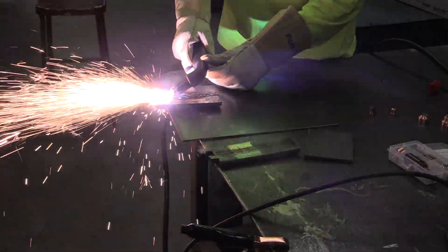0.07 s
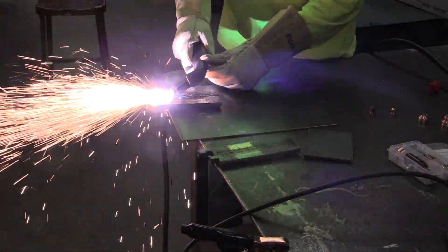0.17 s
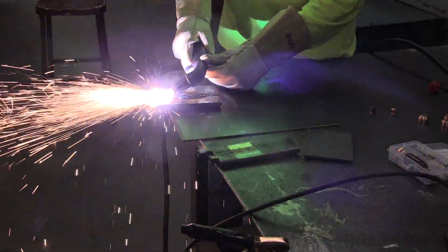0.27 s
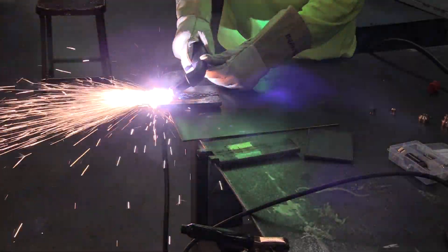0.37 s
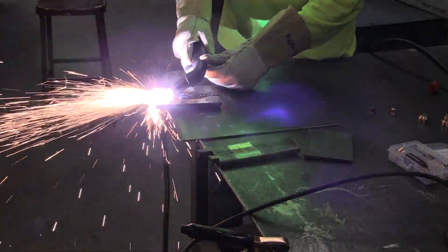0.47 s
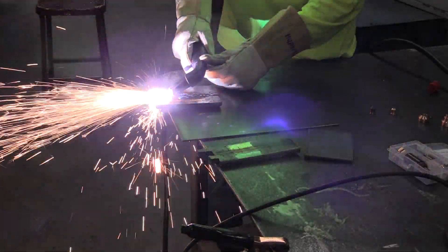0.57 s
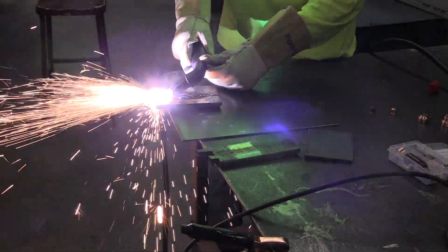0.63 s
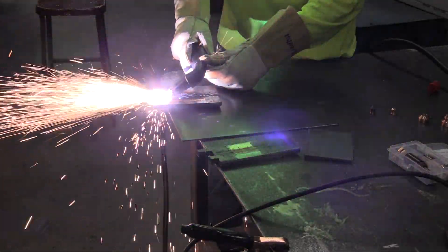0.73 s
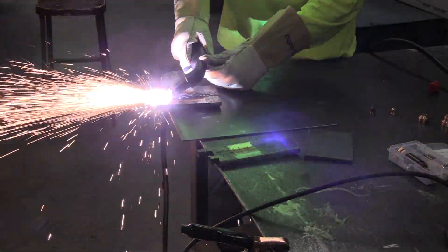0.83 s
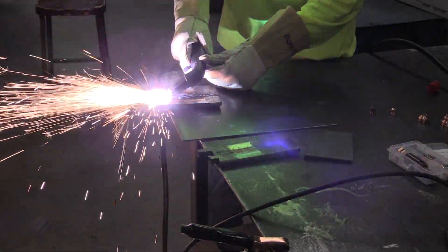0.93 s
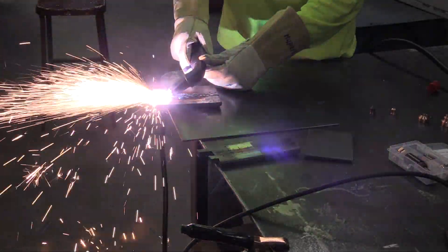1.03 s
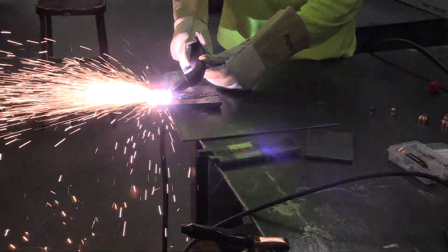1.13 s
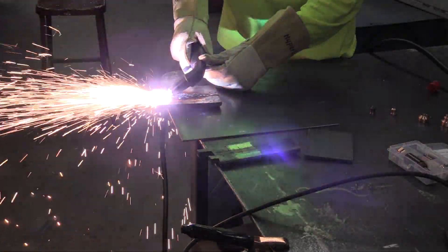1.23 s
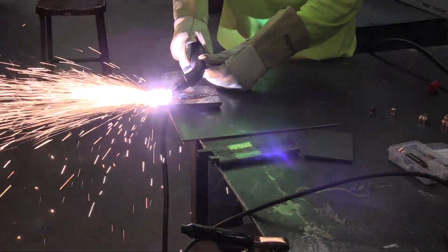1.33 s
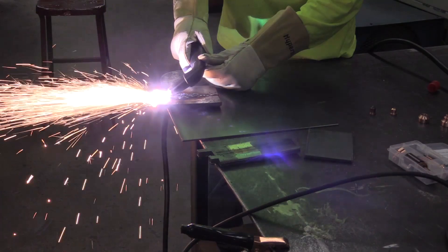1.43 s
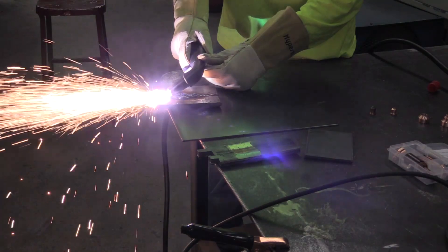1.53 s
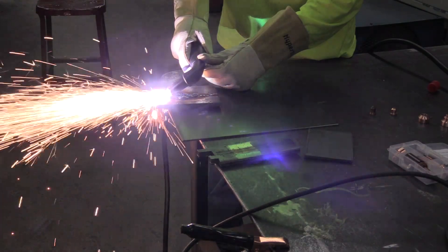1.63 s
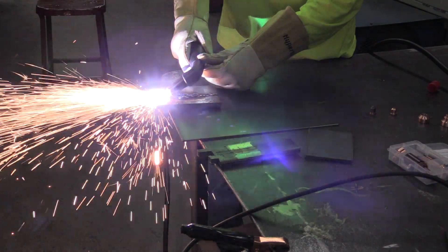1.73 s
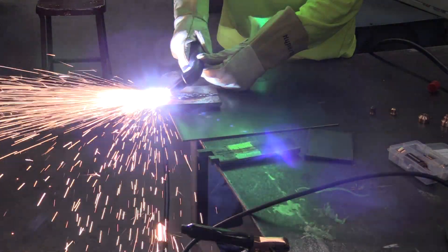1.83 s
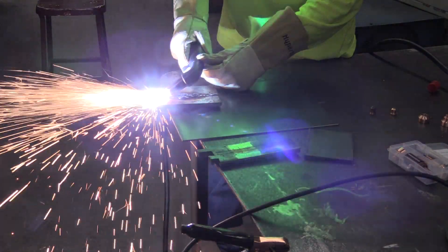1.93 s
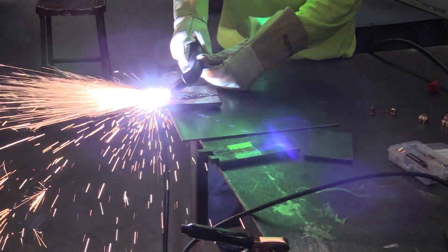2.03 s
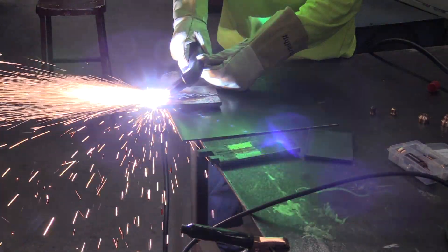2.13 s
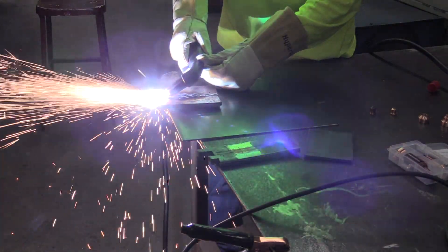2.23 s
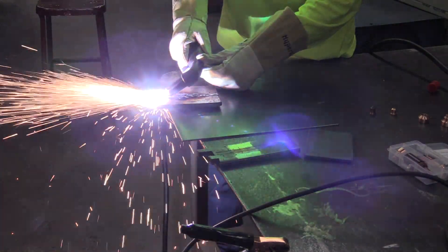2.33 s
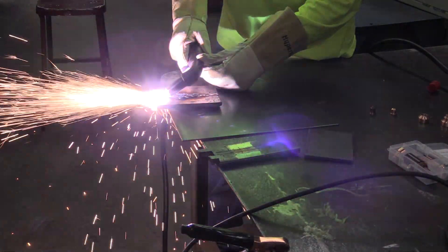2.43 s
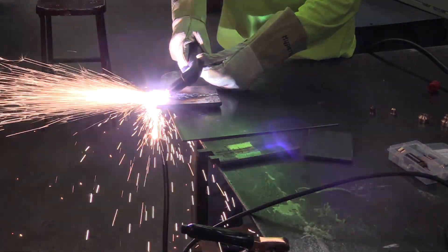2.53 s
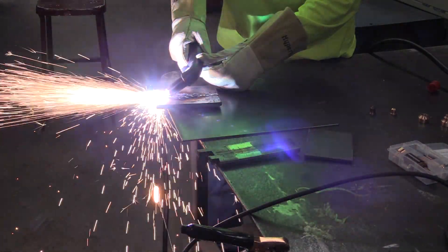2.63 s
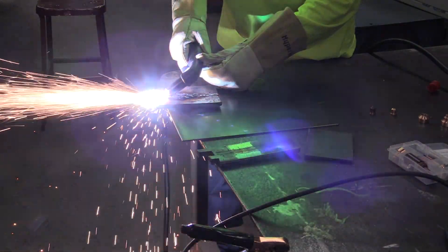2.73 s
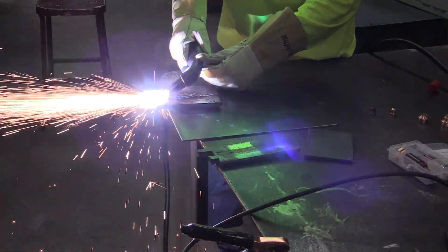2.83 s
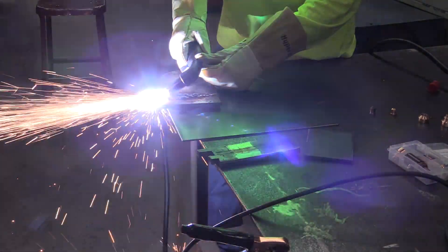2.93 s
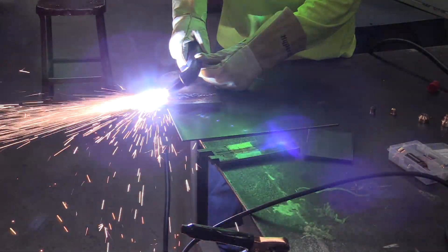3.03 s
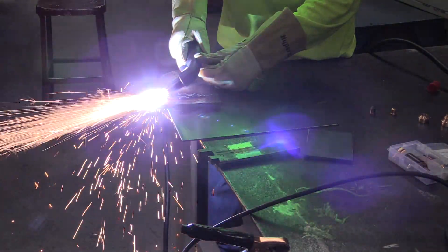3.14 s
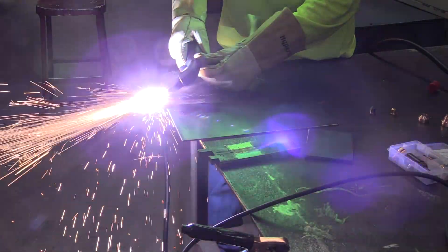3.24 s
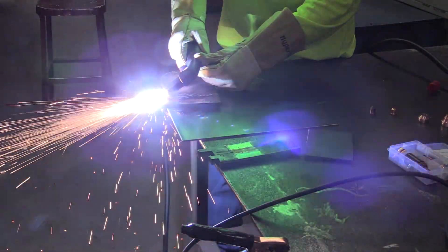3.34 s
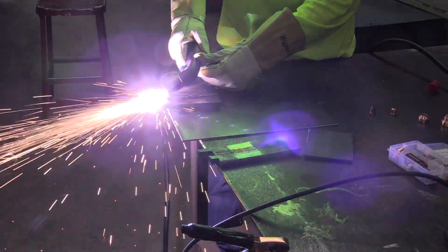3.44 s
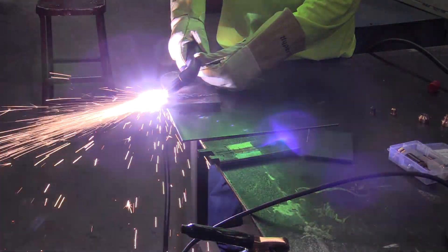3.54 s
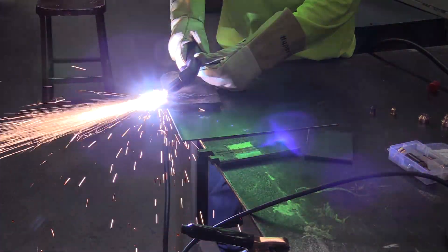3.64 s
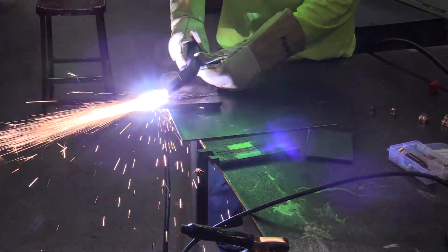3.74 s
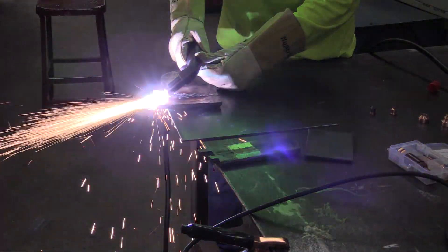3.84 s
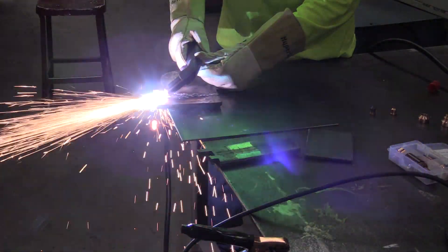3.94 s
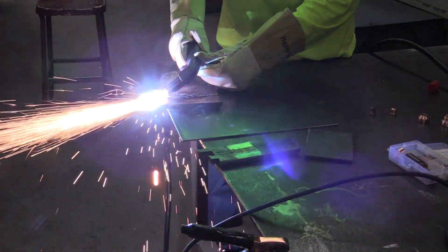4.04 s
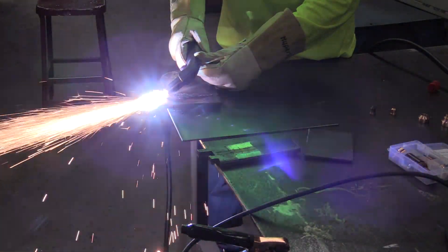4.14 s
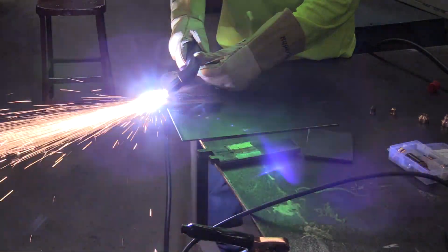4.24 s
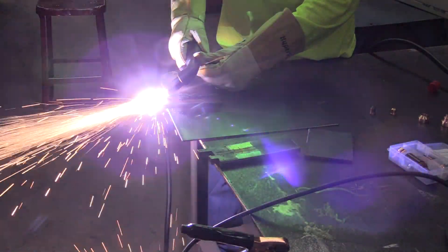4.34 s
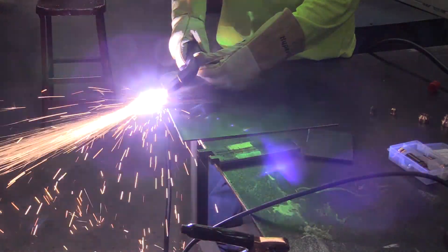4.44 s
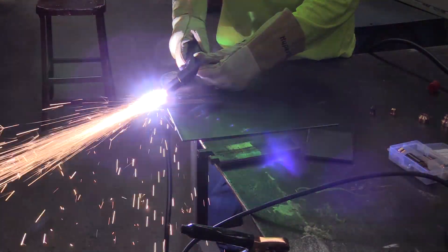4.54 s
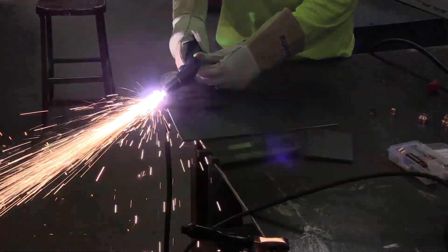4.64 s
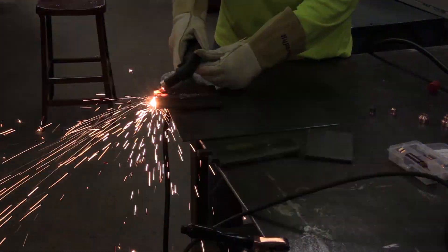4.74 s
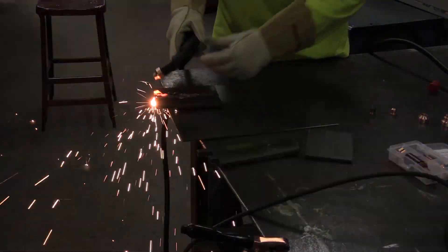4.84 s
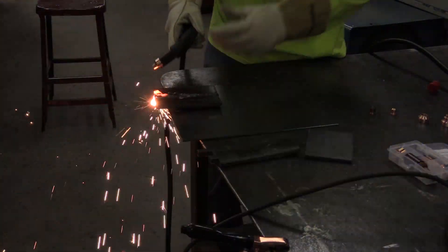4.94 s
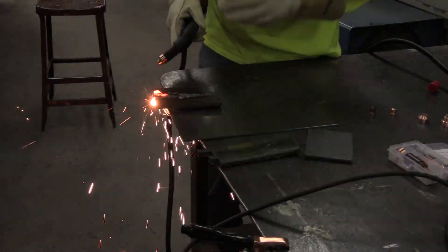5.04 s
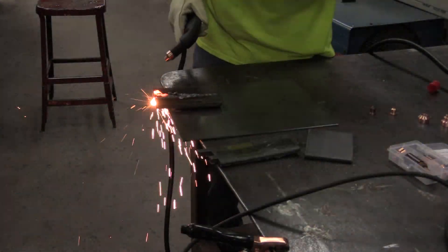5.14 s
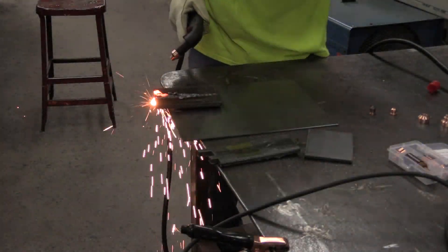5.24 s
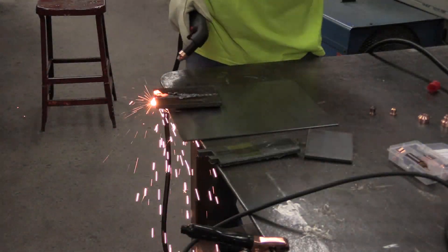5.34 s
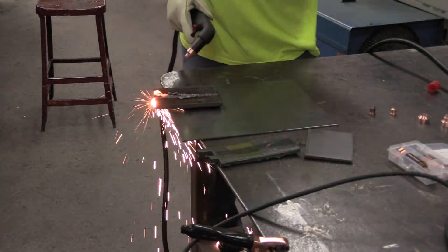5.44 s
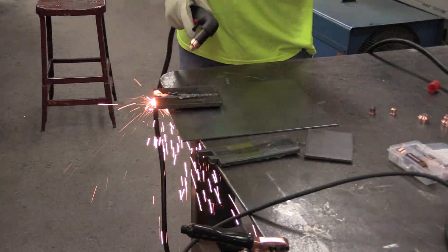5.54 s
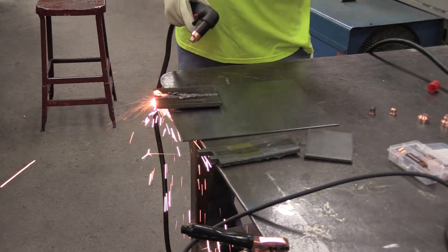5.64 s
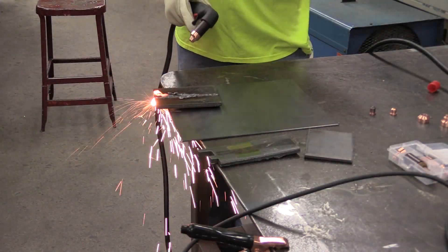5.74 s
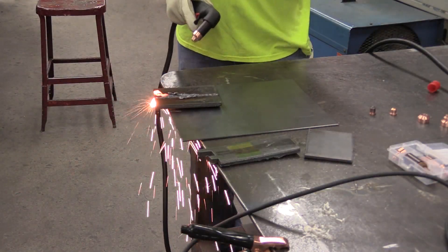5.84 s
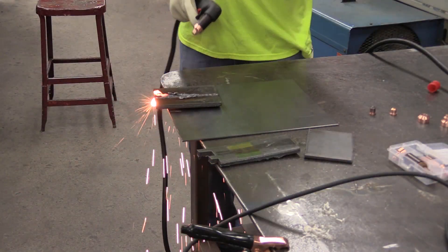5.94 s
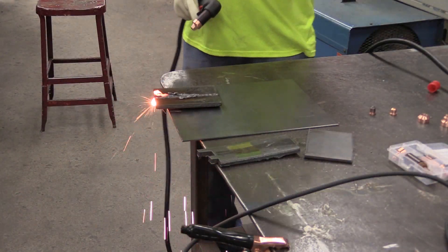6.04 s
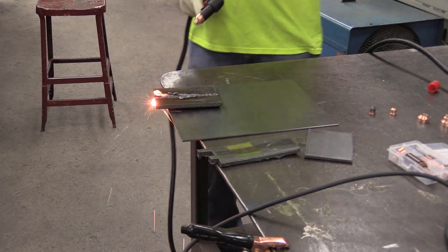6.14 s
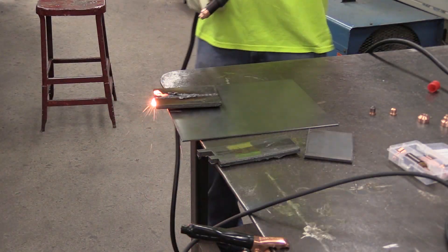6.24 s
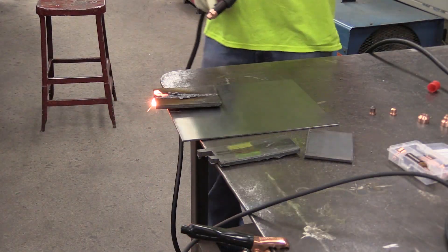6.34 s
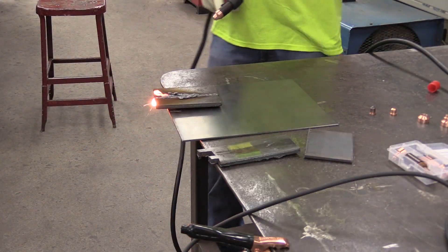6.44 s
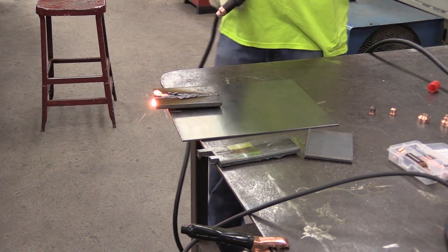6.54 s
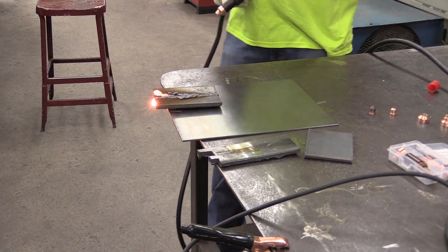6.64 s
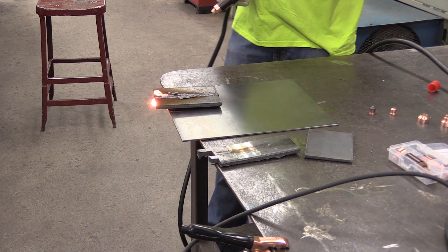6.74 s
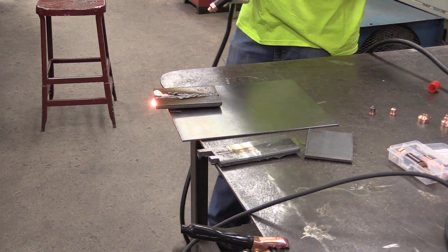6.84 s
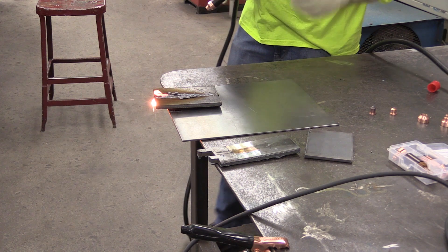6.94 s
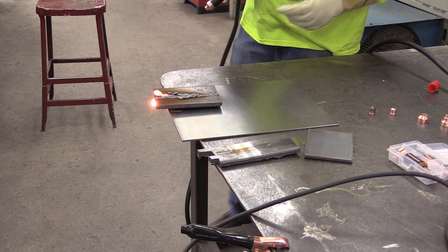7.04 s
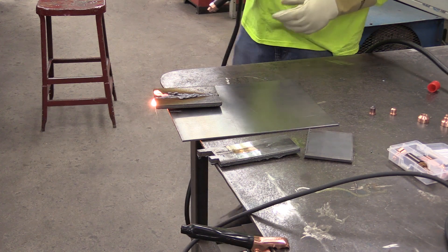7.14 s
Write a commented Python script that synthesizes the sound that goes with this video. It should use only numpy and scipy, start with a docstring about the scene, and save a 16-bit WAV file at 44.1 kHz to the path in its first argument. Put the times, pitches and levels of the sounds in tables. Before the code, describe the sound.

A plasma torch gouges steel with a loud hissing roar, then cuts off, leaving a quieter air hiss and one light knock.

```python
"""A plasma torch gouges steel on a metal workbench: its turbulent arc jet roars and spits melt,
comb-filtered by echoes off bench and floor, until it snaps off and only the cooling air hisses on.
Over the workshop's rumble the power unit's fan gathers speed, and the worker steps back with a scuff
and a knock. A microphone's automatic gain, held down by the roar, creeps back up once the arc is out."""
import sys
import numpy as np
from scipy import signal
from scipy.fft import rfft, irfft
from scipy.io import wavfile
from scipy.ndimage import uniform_filter1d, minimum_filter1d, map_coordinates

SR = 44100
rng = np.random.default_rng(int(sys.argv[2]) if len(sys.argv) > 2 else 0)


def wav_out(sig):
    """Save sig, one row per channel (or a flat mono array), as 16-bit PCM at SR to the path in sys.argv[1]."""
    wavfile.write(sys.argv[1], SR, np.round(np.clip(np.atleast_2d(sig).T, -1, 1) * 32767).astype(np.int16))


N = 317079
T = np.arange(N) / SR
F = np.maximum(np.arange(N // 2 + 1) * SR / N, 1)

ARC_OFF_S = 4.7494
# the nozzle is lifted off the steel, then turned outwards
LIFT_S, LIFT_LENGTH_S, TURN_S, TURN_LENGTH_S = 4.955, 0.32, 5.42, 1.4
FAN_HZ, FAN_TOP_HZ, SPIN_UP_S, SPIN_UP_HZ_PER_S = 72.6, 78.7, 5.87, 5.5

# echoes off bench, floor and worker, one list each: delay/s; gain; treble limit/Hz
ECHO_DELAYS = [.000995, .001727, .001856, .004007, .004487, .006905, .007212, .007396, .008141]
ECHO_GAINS = [0.043, 0.02, 0.046, 0.24, -0.12, 0.2, 0.15, -0.21, 0.11]
ECHO_CUTOFFS = [15000, 15000, 14000, 9600, 1400, 3800, 2300, 1000, 3200]
# workshop rumble: f/Hz, relative spectral level/dB
SHOP_SPECTRUM = [(25, -28), (50, -17), (75, -8), (110, -9), (165, -6), (196, 1), (228, -2), (400, -9),
                 (800, -12.5), (1600, -15.5), (4000, -42)]
# fan harmonics and housing resonances: order, f/Hz, width/Hz, level off resonance/dB, boost/dB
FAN_ORDERS = [(7, 508, 49, -63, 12), (12, 892, 28, -64, 11.5), (16, 1226, 32, -56, 6)]
# shoe and clothing rubs: t/s, Gaussian width/s, centre f/Hz, level/dB
RUBS = [(5.558, 0.088, 270, -42), (5.874, 0.057, 105, -50)]
# a sharp contact, then a duller seating: t/s, level/dB, treble limit/Hz
CONTACTS = [(5.954, -20, 3000), (5.9562, -16, 645)]
# modes of the bumped object: f/Hz, relative level/dB, T60/s
BODY_MODES = [(450, -24, 0.031), (576, -16, 0.062), (658, 0.5, 0.083), (1153, -6.5, 0.066),
              (1650, -3.5, 0.044), (1780, -5.5, 0.046), (2070, -4, .045), (2360, -11, .025)]
# cooling air: f/Hz, relative spectral level/dB
AIR_SPECTRUM = [(300, -20.5), (1000, -12.5), (1500, -9.5), (2300, -3.5), (2800, -1), (3300, -8),
                (3700, 0.5), (4200, -1.5), (5300, -3), (7000, -7), (8400, -4.5), (10800, -11.5),
                (14000, -9), (15700, -10.5)]
# breathy edge tone of the turning nozzle: t/s, f/Hz
EDGE_TONE = [(6.1, 14250), (6.35, 14400), (6.55, 15500), (6.7, 14100), (7.19, 13900)]
# hand strokes along the groove: start t/s, relative level/dB, sizzle/dB, body/dB
HAND_STROKES = [(0.0, -20, 1, -1), (0.59, -20, 0.2, -1.3), (1.2, -20.1, 1, -1), (1.66, -20.5, 1, 1.8),
                (2.07, -20.5, 1.3, 1.5), (2.49, -19.5, 0.2, -0.1), (3.03, -20.5, 0, .7),
                (3.36, -19.0, -1.5, -0.3), (3.96, -20, 0.4, .5), (4.29, -20, -.3, 0)]
# gobs of melt blown out: t/s, added sizzle/dB
MELT_FLARES = [(.19, 1.3), (1.0, 2), (1.86, 1), (3.25, 1.8), (4.7, 3.5)]
# resonances and notches of the gap between nozzle and groove: f/Hz, width/Hz, nominal gain/dB
GAP_RESONANCES = [(1235, 130, 3), (2290, 70, 2.5), (3220, 18, 2.5), (4350, 110, -4), (6560, 140, 3),
                  (6670, 160, -2.5), (7070, 150, 1.5), (7800, 320, 2), (9260, 130, 1.5), (9560, 150, 3.5),
                  (10500, 300, -1), (11400, 220, 4), (12400, 370, 2), (12700, 280, 6.5), (14000, 180, -2.5),
                  (14310, 280, 8), (14760, 200, -2.5), (15050, 280, 8)]
# arc jet: f/Hz, relative spectral level/dB
JET_SPECTRUM = [(30, -59), (95, -38), (160, -20.5), (330, -18), (480, -10.5), (900, -10), (1400, -8.5),
                (1750, -4), (2700, -2.5), (3200, 0), (4400, -5), (6300, -7.5), (11000, -16.5), (15500, -26)]


def undb(db):
    """Amplitude ratio of a level in decibels."""
    return 10 ** (np.asarray(db) / 20)


def unit(x):
    """Normalisation to rms 1."""
    return x / np.sqrt(np.mean(x ** 2))


def colour(points):
    """Gain spectrum interpolated over log frequency from points (f/Hz, level/dB)."""
    hz, db = np.transpose(points)
    return undb(np.interp(np.log(F), np.log(hz), db))


def shape(x, gain):
    """Linear filtering: multiplication of the spectrum by a gain."""
    return irfft(rfft(x) * gain, N)


def noise(gain):
    """Filtered Gaussian noise, rms 1."""
    return unit(shape(rng.standard_normal(N), gain))


def walk(rate_hz):
    """Slow random fluctuation: low-pass noise, rms 1."""
    return noise(1 / (1 + (F / rate_hz) ** 4))


def ramp(start_s, length_s):
    """Linear transition from 0 to 1."""
    return np.clip((T - start_s) / length_s, 0, 1)


def shelf(x, hz, db):
    """Shelving filter: a time-varying gain above hz."""
    return x + (undb(db) - 1) * shape(x, 1 / (1 + (hz / F) ** 4))


def resonance(hz, width_hz):
    """Narrow-band noise by quadrature modulation about a centre that may move, rms 1."""
    skirt = 1 / (1 + (2 * F / width_hz) ** 4)
    phase = 2 * np.pi * np.cumsum(hz * np.ones(N)) / SR
    return noise(skirt) * np.cos(phase) + noise(skirt) * np.sin(phase)


def delayed(x, delay_s):
    """Variable delay, whose rate of change shifts the pitch."""
    return map_coordinates(x, [(T - delay_s) * SR], mode="mirror")


def reverberation(x, wet_db, t60, damp_hz, first_s):
    """A diffuse field: dense reflections begin after first_s and decay exponentially."""
    decay = undb(-60 * np.minimum(T / t60, 4)) * (T > first_s)
    tail = noise(1 / (1 + (F / damp_hz) ** 2)) * decay
    tail = tail[:SR] / np.sqrt(np.mean(abs(rfft(tail)[F < 4000]) ** 2))
    return undb(wet_db) * signal.fftconvolve(x, tail)[:N]


def near_echoes(x):
    """Interference with echoes off nearby hard surfaces combs the spectrum."""
    echoes = sum(gain * np.exp(-2j * np.pi * F * delay) / (1 + (F / hz) ** 2)
                 for delay, gain, hz in zip(ECHO_DELAYS, ECHO_GAINS, ECHO_CUTOFFS))
    return shape(x, 1 + echoes)


def clutter(x):
    """Scattering: tools and offcuts on the bench return the short wavelengths."""
    scattered = reverberation(x, wet_db=-11, t60=.07, damp_hz=30000, first_s=.002)
    return shape(scattered, 1 / (1 + (3500 / F) ** 4))


def shop_rumble(level_db=-46.5, swell_db=1):
    """Ventilation and machines radiate broadband noise, strongest in the bass."""
    return noise(colour(SHOP_SPECTRUM)) * undb(level_db + swell_db * walk(15))


def drone(hz=196, width_hz=50, level_db=-57, rise_db=5):
    """Narrow-band noise, heard as a rough drone, grows as the fan gathers speed."""
    spin_up = ramp(SPIN_UP_S, (FAN_TOP_HZ - FAN_HZ) / SPIN_UP_HZ_PER_S)
    return resonance(hz, width_hz) * undb(level_db + rise_db * spin_up)


def fan(wobble=0.0013, flicker_db=2):
    """Forced resonance: with the load gone the fan speeds up, sweeping harmonics past housing modes."""
    shaft_hz = np.clip(FAN_HZ + SPIN_UP_HZ_PER_S * (T - SPIN_UP_S), FAN_HZ, FAN_TOP_HZ)
    angle = 2 * np.pi * np.cumsum(shaft_hz * (1 + wobble * walk(21))) / SR
    out = np.zeros(N)
    for order, hz, width_hz, db, boost_db in FAN_ORDERS:
        order = round(order)
        in_tune = 1 / (1 + (2 * (order * shaft_hz - hz) / width_hz) ** 2)
        level_db = db + boost_db * in_tune + flicker_db * walk(7.5)
        out += np.sqrt(2) * np.sin(order * angle) * undb(level_db)
    return out


def scuffs(rough_db=3):
    """Sliding friction of shoe and clothing gives short, dull, uneven bursts of noise."""
    out = np.zeros(N)
    for t, width_s, hz, db in RUBS:
        rub = noise(1 / (1 + (F / hz - hz / F) ** 2) ** 0.53)
        envelope = np.exp(-.5 * ((T - t) / width_s) ** 2)
        out += rub * envelope * undb(db + rough_db * walk(40))
    return out


def knock(low_cut_hz=370):
    """Impact excites the damped modes of a hard object; softer contact leaves out the high ones."""
    out = np.zeros(N)
    for t, db, soft_hz in CONTACTS:
        age = np.maximum(T - t, 0)
        for hz, mode_db, t60 in BODY_MODES:
            envelope = undb(db + mode_db - 60 * np.minimum(age / t60, 4))
            out += envelope * np.sin(2 * np.pi * hz * age) / (1 + (hz / soft_hz) ** 4)
    # a small body radiates little bass
    return signal.sosfilt(signal.butter(2, low_cut_hz, "high", fs=SR, output="sos"), out)


def bench_sweep(x, gain=0.095, near_s=0.000286, far_s=0.0009, sway_s=0.00003):
    """A moving comb filter: the path of the bench echo changes as the nozzle rises and sways."""
    rise = ramp(LIFT_S, LIFT_LENGTH_S + TURN_LENGTH_S)
    return x + gain * delayed(x, near_s + (far_s - near_s) * rise + sway_s * walk(1.5))


def cooling_air(free_db=-33, splash_db=5.5, shade_db=-8.5, facing_db=2, whistle_db=-12, flutter_db=0.8):
    """Turbulent air hisses and excites the nozzle; impinging on the steel, it is louder and duller."""
    lift, turn = ramp(LIFT_S, LIFT_LENGTH_S), ramp(TURN_S, TURN_LENGTH_S)
    level_db = free_db + splash_db * (1 - lift)
    treble_db = shade_db * (1 - ramp(LIFT_S, length_s=0.24)) + facing_db * turn
    hiss = bench_sweep(shelf(noise(colour(AIR_SPECTRUM)), 4400, treble_db))
    # the nozzle rings louder and lower as it comes free and turns
    nozzle_db = -8.5 + 4 * ramp(TURN_S, length_s=.3) + 2.5 * turn
    nozzle = resonance(hz=3330 - 230 * turn, width_hz=820) * undb(nozzle_db + 0.5 * walk(13))
    whistle_hz = np.interp(T, *np.transpose(EDGE_TONE))
    whistle = resonance(whistle_hz, width_hz=1000) * undb(whistle_db) * turn
    return (hiss + nozzle + whistle) * undb(level_db + flutter_db * walk(24))


def snap(gain_db=-0.5, width_s=0.00012, low_cut_hz=95):
    """The hot gas column collapses as the current stops, radiating one rarefaction pulse."""
    pulse = -undb(gain_db) * np.exp(-.5 * ((T - ARC_OFF_S) / width_s) ** 2)
    return shape(pulse, 1 / (1 + low_cut_hz / (1j * F)))


def spatter(rate_per_s=500, spread_db=1.5, level_db=-14, low_cut_hz=1500):
    """Shot noise: droplets of melt burst in the jet as dense ticks, a few of them larger."""
    bursts = rng.random(N) < rate_per_s / SR
    sizes = undb(spread_db * np.minimum(rng.exponential(size=N), 4))
    spectrum = colour(JET_SPECTRUM) / (1 + low_cut_hz / (1j * F))
    return undb(level_db) * unit(shape(bursts * sizes, spectrum))


def strokes(blend_s=0.18, bite_s=0.051, ease_s=0.063, dip_db=1.44, sag_db_per_s=1.84, flare_s=0.086):
    """Modulation of the jet's level, sizzle and body: each hand stroke bites in, sags and eases off."""
    starts, level_db, sizzle_db, body_db = np.transpose(HAND_STROKES)
    current = np.maximum(np.searchsorted(starts, T, side="right") - 1, 0)
    sag_db = sag_db_per_s * (T - starts[current])
    slack_db = dip_db * sum(np.exp(-((T - t) / np.where(T < t, ease_s, bite_s)) ** 2) for t in starts)
    flare_db = sum(db * np.exp(-((T - t) / flare_s) ** 2) for t, db in MELT_FLARES)
    blend = lambda db: uniform_filter1d(db, int(blend_s * SR))
    return (blend(level_db[current] - sag_db) - slack_db,
            blend(sizzle_db[current]) + flare_db,
            blend(body_db[current]))


def gap_ring(jet, strength=1.27, fade_per_s=0.14, rise_per_s=.0025, in_tune_s=1.2):
    """Cavity resonance of the gap weakens and creeps up in pitch as the hand tilts and trembles."""
    ring = strength * np.exp(-fade_per_s * T) * (1 + 0.12 * walk(7))
    gap_db = sum(db / (1 + (2 * (F - hz) / width) ** 4) for hz, width, db in GAP_RESONANCES)
    ringing = jet + ring * shape(jet, undb(gap_db) - 1)
    pitch_shift = rise_per_s * (T - in_tune_s) + 0.001004 * walk(1.98)
    return delayed(ringing, -np.cumsum(pitch_shift) / SR)


def arc_jet(gain_db=6.5, flutter_db=0.25, sizzle_flutter_db=0.5, quench_s=0.0035):
    """Turbulent jet noise: plasma tears through the groove, fluttering, until the arc is quenched."""
    stroke_db, sizzle_db, body_db = strokes()
    jet = gap_ring(unit(noise(colour(JET_SPECTRUM)) + spatter()))
    jet = shelf(jet, 4900, sizzle_db + sizzle_flutter_db * walk(11))
    jet = shelf(jet, 1370, -body_db) * undb(body_db)  # body is the band below the shelf
    burning = np.exp(-np.maximum(T - ARC_OFF_S, 0) / quench_s)
    return jet * burning * undb(stroke_db + gain_db + flutter_db * walk(17))


def scene():
    """Superposition of torch, worker, reverberation and machines at one point in the workshop."""
    jet = near_echoes(arc_jet() + snap())
    near = jet + clutter(jet) + cooling_air() + knock() + scuffs()
    hall = reverberation(near, wet_db=-10.5, t60=0.57, damp_hz=6960, first_s=0.011)
    mix = near + hall + fan() + shop_rumble() + drone()
    return np.array([mix, mix])


def gain_control(x, threshold_db=-25, range_db=6.5, hold_s=0.2, release_s=0.64):
    """Compression: loud sound turns the gain down over a limited range; it holds, then creeps back."""
    power = uniform_filter1d(np.mean(x ** 2, axis=0), SR // 10)
    gain_db = -np.clip(10 * np.log10(power + 1e-12) - threshold_db, 0, range_db)
    hold, release = int(hold_s * SR), int(release_s * SR)
    held_db = minimum_filter1d(gain_db, hold, origin=(hold - 1) // 2)
    released_db = uniform_filter1d(held_db, release, origin=(release - 1) // 2)
    return x * undb(np.minimum(held_db, released_db))


def record(dry, top_hz=15750):
    """Band limiting: a steep low-pass filter follows the automatic gain."""
    low_pass = signal.ellip(12, .1, 80, top_hz, fs=SR, output="sos")
    return signal.sosfilt(low_pass, gain_control(dry))


dry = scene()
out = record(dry)
wav_out(out)
```